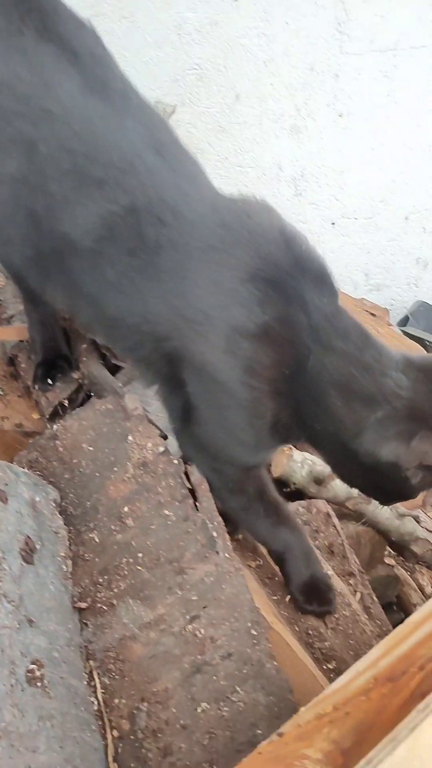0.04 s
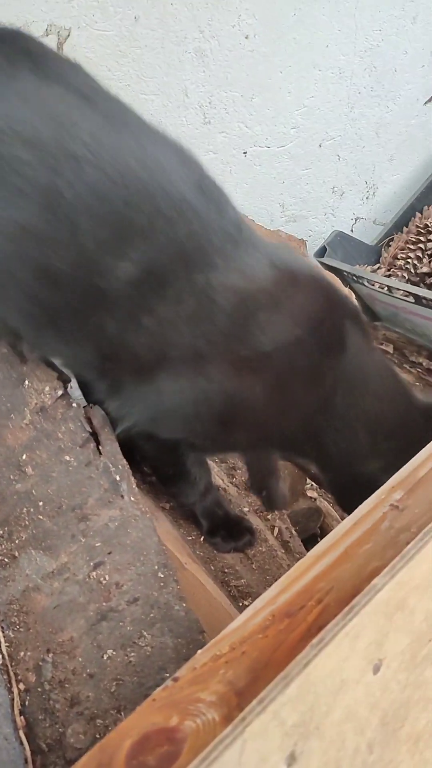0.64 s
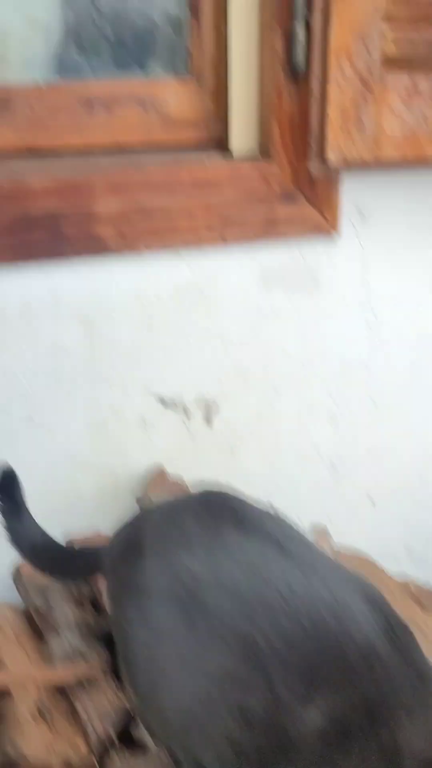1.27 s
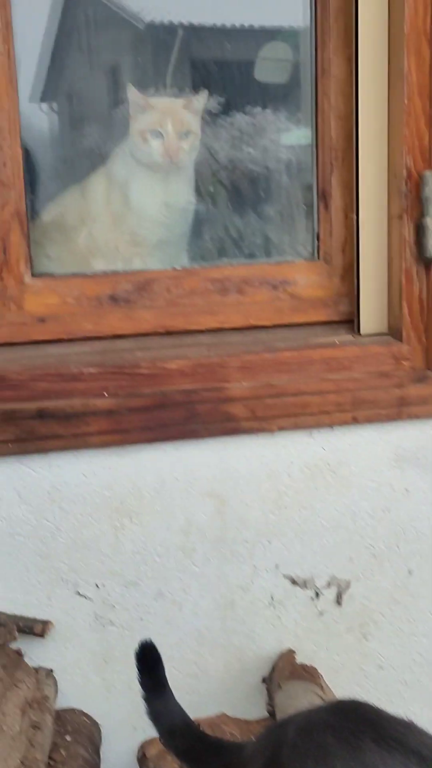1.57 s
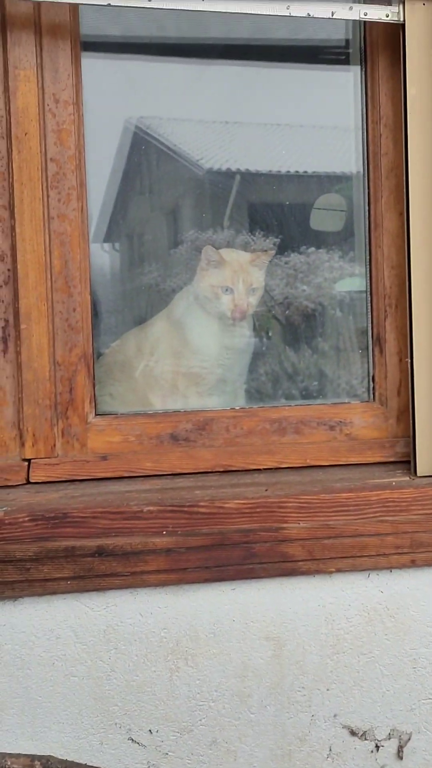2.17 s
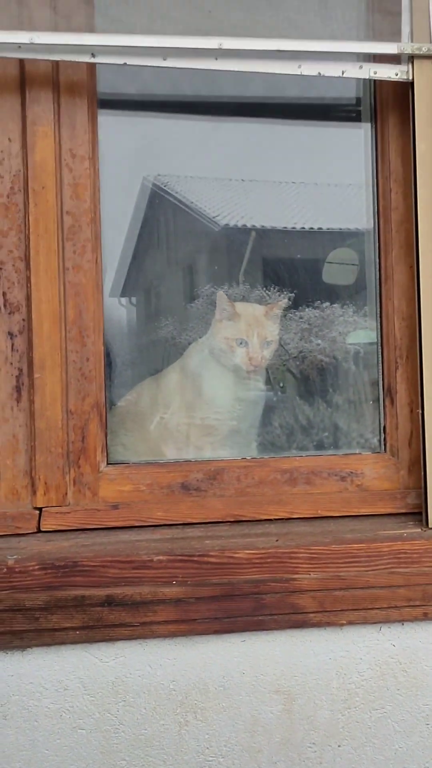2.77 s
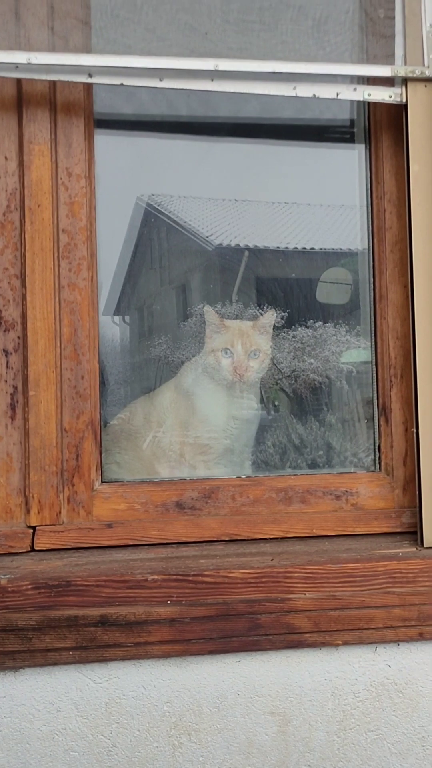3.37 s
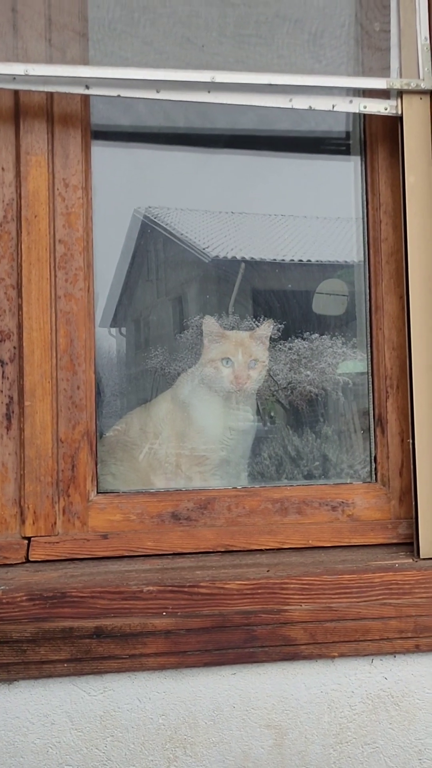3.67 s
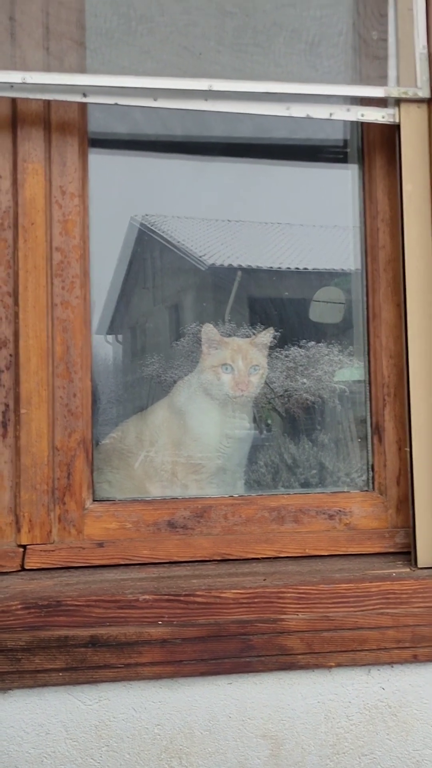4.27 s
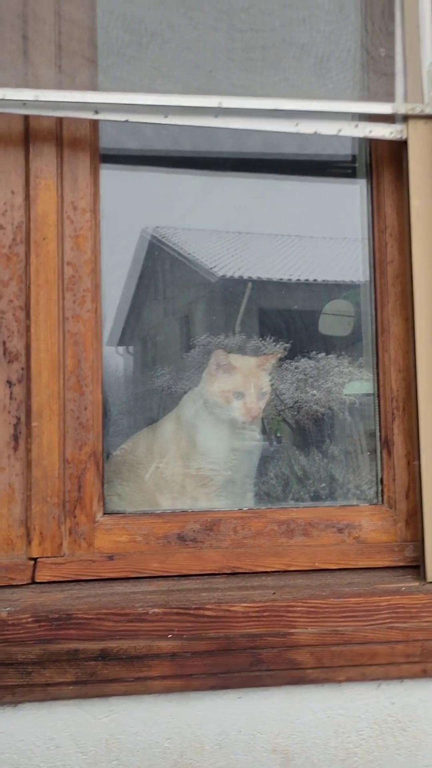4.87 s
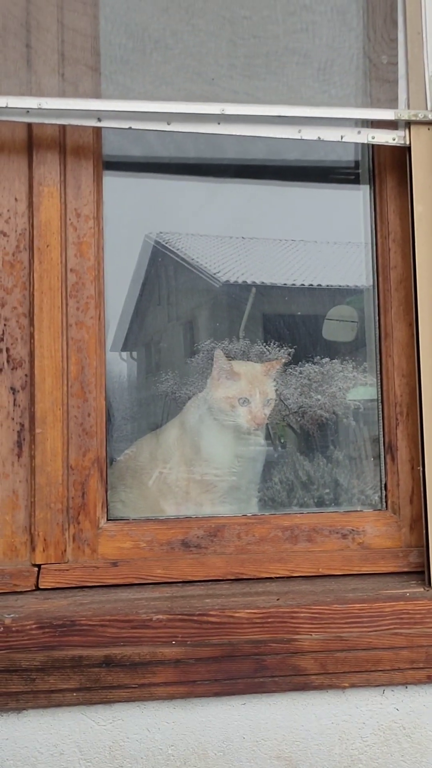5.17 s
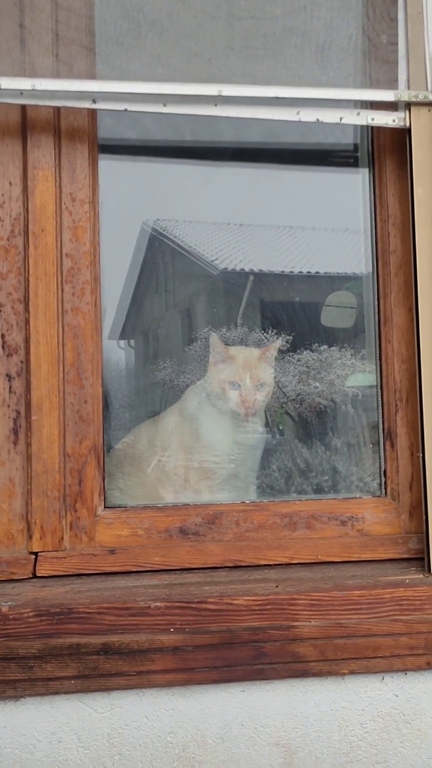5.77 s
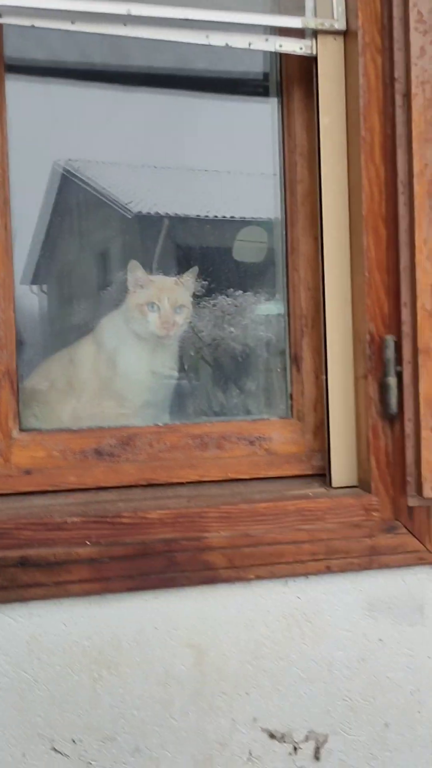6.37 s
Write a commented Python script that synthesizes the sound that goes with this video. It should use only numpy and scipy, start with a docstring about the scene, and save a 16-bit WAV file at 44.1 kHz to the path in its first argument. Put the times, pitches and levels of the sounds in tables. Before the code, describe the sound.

The sound is close, picked up outdoors beside a house wall by a microphone held near the body, over a faint low rumble. At about 0.1 seconds a light footstep snaps through crusted snow with a jacket swish. A second light step follows near 1 second, with more swishing. From about 1.5 to 1.9 seconds comes the loudest event: a heavy step that breaks the crust in a dense, crisp crunch, with a low thud of packing snow.

From 2 seconds on, the walker stands nearly still. Fabric slides softly, fingers bump the microphone now and then, and small crackles come from underfoot, clearest around 2.4, 3 and 6 seconds. A small piece of metal tinkles very faintly at about 4.3 and 5.1 seconds. A soft jacket swish swells from around 6 seconds to the end, at about 6.6 seconds.

```python
"""A light step snaps through crunchy ground, probably crusted snow, with the swish of a jacket.
A second light step follows, then a full, heavy one that breaks the crust and packs the snow beneath.
The walker then stands nearly still: fabric slides, fingers bump a camera held close to the body,
a bit of metal tinkles and small crackles go on underfoot. A house wall throws back a short tail
from the feet, and a faint outdoor rumble lies under it all."""
import sys
import numpy as np
from scipy import signal
from scipy.fft import rfft, irfft, next_fast_len
from scipy.io import wavfile
from scipy.ndimage import map_coordinates

SR = 44100
rng = np.random.default_rng(int(sys.argv[2]) if len(sys.argv) > 2 else 0)


def wav_out(sig):
    """Save sig, one row per channel (or a flat mono array), as 16-bit PCM at SR to the path in sys.argv[1]."""
    wavfile.write(sys.argv[1], SR, np.round(np.clip(np.atleast_2d(sig).T, -1, 1) * 32767).astype(np.int16))


N = 292323
TIME = np.arange(N) / SR
LAND_S, BEAR_S, LIFT_S = 1.64, 1.742, 1.84  # the heavy step lands, bears the most weight, lifts

# the clearest breaks of the crust: (time [s], level [dB], ping pitch [Hz])
CRUST_BREAKS = [(0.0709, -31, 4500), (0.1182, -12.0, 5130), (0.1278, -23, 4900), (0.146, -25, 5400),
                (0.1528, -21.5, 4600), (0.1636, -23, 4800), (0.201, -28.5, 4900), (0.2449, -28.6, 3900),
                (0.2567, -28.5, 4600), (0.3422, -27.5, 4500), (0.7008, -48.5, 4000), (0.972, -36.5, 4840),
                (1.0542, -25.0, 5300), (1.0589, -21.5, 5070), (1.0625, -17, 4760), (1.5089, -17.5, 5060),
                (1.599, -15, 5470), (1.6321, -12, 4560), (1.6578, -2.3, 4400), (1.6754, -7, 5620),
                (1.6826, -14, 5270), (1.6948, -3.5, 4700), (1.7073, -3.5, 5000), (1.7251, -7.7, 2510),
                (1.7341, -13.5, 3200), (1.749, -7.5, 4480), (1.7826, -6.5, 5100), (1.8045, -14, 4000),
                (1.8203, -15.5, 4500), (1.8277, -14.5, 4300), (1.8305, -13, 4300), (1.8755, -15.1, 5100),
                (1.8796, -16, 5270), (1.8937, -11, 4800), (1.9007, -18, 5200), (1.918, -31.5, 5220),
                (2.3933, -27, 5300), (2.4175, -21, 5600), (2.8904, -43.8, 5740), (3.0027, -31.0, 4690),
                (3.7634, -43.5, 5090), (4.2444, -42, 5500), (4.3482, -36.9, 5690), (4.7649, -39, 5100),
                (4.8444, -43.5, 5700), (5.0979, -32.5, 5840), (5.1555, -43.5, 4560), (5.341, -43.5, 5000),
                (5.3457, -41.5, 5100), (5.4932, -46, 4315), (5.5652, -45, 4440), (5.582, -47, 5340),
                (5.9874, -28.5, 4200), (6.0254, -35, 4500)]
# dead knocks of boots and of fingers on the camera: (time [s], peak [dB], pitch [Hz], decay [cycles])
KNOCKS = [(0.0681, -29.5, 420, 0.064), (.067, -45, 85, 0.54), (.978, -57, 202, .7), (1.709, -17, 1500, .7),
          (1.7483, -21, 920, 0.83), (1.7672, -21.5, 309, .5), (2.178, -57, 352, 0.35),
          (2.552, -53.5, 166.7, .5), (3.002, -44, 805, 1.16), (3.081, -60.5, 280, 0.45),
          (3.151, -55.5, 590, 0.6), (3.55, -59, 541, 0.76), (3.782, -54.5, 510, 0.48),
          (3.891, -49, 510, .5), (4.315, -54, 199.6, 0.46), (4.619, -55.5, 316, .4),
          (4.694, -47.5, 100, 0.62), (4.93, -50.5, 79.9, 0.72), (5.609, -56.5, 198.3, 0.4),
          (5.9873, -35, 2570, 0.74), (6.075, -61.5, 259, .6), (6.13, -52.5, 200, 0.68),
          (6.159, -56, 280, .6), (6.247, -44, 1700, 1.6)]
# touches of a small metal piece, perhaps a zip pull: (time [s], level [dB])
METAL_TOUCHES = [(4.35, -70), (4.358, -65.5), (5.1, -59), (5.115, -69)]
# its ringing modes: (frequency [Hz], relative level [dB], time to fall 60 dB [s])
METAL_MODES = [(655, -13, 0.065), (1250, -6, .07), (1464, -2, 0.044), (1790, -19, .05), (2870, -9, 0.06),
               (3880, -3, 0.073), (5860, 0, 0.043), (6220, 6.5, 0.049)]
# slips of the sole: (time [s], level [dB], length [s], hiss relative to grit [dB])
SOLE_SLIPS = [(0.067, -43, 0.008, -13.5), (0.29, -47.5, 0.026, -31), (0.773, -63.5, 0.017, -15),
              (1.72, -31, 0.02, -14.5), (1.826, -36.5, 0.02, -1.5), (2.986, -60, 0.029, 3),
              (3.52, -67.5, 0.012, 4), (4.282, -67.5, 0.044, 1), (4.346, -67, 0.018, 4),
              (4.684, -71.5, 0.019, 11), (5.099, -62, 0.0092, 22), (5.111, -69, 0.017, 17),
              (5.239, -74.5, 0.043, 10)]
# jacket strokes: (time at full speed [s], swish level [dB], 10 dB rise [s], hold [s], 10 dB fall [s],
# rub offset [dB])
JACKET_STROKES = [(0.0, -58, .05, 0.078, .05, -3.5), (0.152, -49, 0.054, 0.1, 0.078, -6),
                  (0.484, -57.5, .13, 0.032, 0.12, -9), (0.788, -70, .04, 0.1, .05, -6.5),
                  (1.072, -45, 0.054, .035, .17, -9.5), (1.245, -51, .07, 0.044, 0.25, -12),
                  (1.516, -46, 0.0097, .01, 0.042, -7), (1.583, -39, 0.023, .065, .07, -12.5),
                  (1.83, -40, 0.037, 0.053, 0.033, -7), (1.949, -54.5, 0.019, 0.0083, 0.029, -2.5),
                  (2.378, -66, 0.042, 0.17, 0.065, -7), (2.847, -68.5, 0.031, 0.04, .08, -7.5),
                  (3.0, -71.5, 0.033, 0.15, .04, -7.5), (3.874, -66, 0.084, 0.076, 0.029, -5.5),
                  (4.074, -66.5, 0.018, .02, 0.062, -17), (4.82, -71.5, 0.085, .03, .025, -7.5),
                  (4.93, -64.5, 0.034, .02, .04, -15.5), (5.061, -61, 0.021, .01, 0.018, -12),
                  (5.109, -59, 0.014, 0.016, 0.044, -10), (5.339, -69.5, .035, 0.22, 0.023, -9.5),
                  (6.22, -55.5, .2, 0.26, 0.13, -11), (6.62, -58.5, 0.059, .01, .1, -13)]
# the jacket's faint rustle as the body sways: (time [s], level [dB])
BODY_SWAY = [(0, -80.5), (1.8, -79), (2.0, -65), (2.3, -67.5), (2.7, -73), (3.0, -73.5), (3.45, -76),
             (3.55, -73), (3.74, -73.5), (4.02, -74), (4.18, -70.5), (4.34, -70.5), (4.41, -80.5),
             (4.6, -80), (4.72, -74), (5.0, -79.5), (5.68, -81), (5.77, -70.5), (6.63, -74)]

# tone colours, each (frequency [Hz], relative level [dB])
AIR_EQ = [(12, 3.5), (25, 5.5), (60, -1), (100, -11.5), (200, -15.5), (400, -27.5), (1000, -37.5),
          (4000, -40.5), (8000, -42)]  # outdoor rumble
STRIDE_EQ = [(1000, -41), (2300, -16.5), (3000, -12.5), (3700, -3), (4500, -1.5), (5200, 0), (6100, -2.5),
             (7000, -3.5), (7600, -7), (9000, -16.5)]  # broad swish of fabric in a stride
STANDING_EQ = [(1000, -51), (2500, -32), (3800, -11.5), (4500, -6.5), (5200, 1), (5850, 4.5), (6800, -3),
               (7500, -6.5), (9000, -25.5)]  # narrow, bright hiss of fabric at a stand; also the edge of a scrape
RUB_EQ = [(60, -24), (200, -0.5), (500, -0.5), (800, -0.5), (1200, -3), (1700, -3.5), (2500, -6),
          (3500, -3), (6000, -15.5), (9000, -29.5)]  # midrange body of rubbing folds
PACKING_EQ = [(18, -23), (35, -4.5), (75, 0), (140, -1), (300, -9), (600, -18), (1500, -45), (4000, -83.5)]  # low thud of snow packing
CRUNCH_EQ = [(60, -25.5), (200, -7), (500, -3), (880, 2), (1300, -3.5), (2200, -2), (3300, -1), (4700, 0.5),
             (7300, -3.5), (9000, -18)]  # crystals giving way


def amp(db):
    """Decibels to gain."""
    return 10 ** (np.asarray(db) / 20)


def unit(x):
    """Scale to rms 1."""
    return x / np.sqrt(np.mean(x ** 2) + 1e-20)


def filtered(x, response):
    """Filter x by a gain given as a function of frequency."""
    size = next_fast_len(N + 8192)
    return irfft(rfft(x, size) * response(np.fft.rfftfreq(size, 1 / SR)), size)[:N]


def coloured(x, eq):
    """Shape x with an EQ curve on a log frequency axis, at rms 1."""
    points_hz, db = np.transpose(eq)
    return unit(filtered(x, lambda hz: amp(np.interp(np.log(hz + 1), np.log(points_hz), db))))


def wobble(rate):
    """A smooth random curve, rate knots a second."""
    return map_coordinates(rng.standard_normal(int(N * rate / SR) + 4), [TIME * rate])


def grains(rate, spread_db):
    """Random one-sided clicks, about rate a second, many small and a few large, at rms 1."""
    size = amp(spread_db * np.minimum(rng.exponential(size=N), 4))
    return unit(size * (rng.random(N) < rate / SR))


def add(track, s, sound):
    """Mix a sound into the track at time s."""
    start = max(round(s * SR), 0)
    track[start:start + len(sound)] += sound[:max(N - start, 0)]


def outside(start, end):
    """Seconds still to go before start, and seconds gone since end, for each sample."""
    return np.maximum(start - TIME, 0), np.maximum(TIME - end, 0)


def outdoor_air(level_db=-67):
    """A bed of faint rumble whose level drifts."""
    return amp(level_db + wobble(5)) * coloured(rng.standard_normal(N), AIR_EQ)


def wall_reflections(x, level_db=-29, t60=.09, predelay_s=.003):
    """The house wall and the ground scatter back a short, weak tail."""
    t = np.arange(SR // 5) / SR
    tail = rng.standard_normal(len(t)) * amp(-60 * t / t60) * (t > predelay_s)
    return amp(level_db) * signal.fftconvolve(x, tail / np.linalg.norm(tail))[:N]


def metal_tinkles():
    """Each touch rings the metal's modes at new strengths."""
    out, t = np.zeros(N), np.arange(SR // 5) / SR
    for s, db in METAL_TOUCHES:
        strengths = amp(db + 2 * rng.standard_normal(len(METAL_MODES)))
        for strength, (hz, mode_db, t60) in zip(strengths, METAL_MODES):
            add(out, s, strength * amp(mode_db - 60 * t / t60) * np.sin(2 * np.pi * hz * t))
    return out


def knocks():
    """A heavily damped bump of boot or finger swings about once; the deadest give a single push."""
    out, t = np.zeros(N), np.arange(SR // 10) / SR
    for s, db, hz, cycles in KNOCKS:
        swing = np.sin(2 * np.pi * hz * t) * np.exp(-t * hz / cycles)
        add(out, s, amp(db) * swing / swing.max())
    return out


def body_movement(sway_rub_db=-81, rub_follows=.25):
    """Envelopes of the fabric's swish and rub: each stroke rises, holds and falls on top of the sway."""
    sway_db = np.interp(TIME, *np.transpose(BODY_SWAY))
    swish_power = amp(sway_db + 1.2 * wobble(14)) ** 2
    rub_power = amp(sway_rub_db + rub_follows * (sway_db - sway_db.mean())) ** 2
    for s, db, rise, hold, fall, rub_db in JACKET_STROKES:
        before, after = outside(s, s + hold)
        stroke_power = amp(db - 10 * (before / rise + after / fall)) ** 2
        swish_power += stroke_power
        rub_power += stroke_power * amp(rub_db) ** 2
    return np.sqrt(swish_power), np.sqrt(rub_power)


def jacket(swish, rub, rub_trim_db=-1, settle_s=1.86, crossfade_s=.089):
    """Sliding fabric hisses, broad in a stride and narrow once standing; single fibres catch and tick."""
    catches = grains(rate=98, spread_db=4)
    threads = rng.standard_normal(N) + amp(-12) * catches
    folds = rng.standard_normal(N) + amp(-6) * catches + amp(-8) * grains(rate=240, spread_db=1)
    standing = np.clip((TIME - settle_s) / crossfade_s + .5, 0, 1)
    hiss = (1 - standing) * coloured(threads, STRIDE_EQ) + standing * coloured(threads, STANDING_EQ)
    flutter = amp(.8 * wobble(90))
    return flutter * (swish * hiss + amp(rub_trim_db) * rub * coloured(folds, RUB_EQ))


def underfoot_crackles(motion, trim_db=-9):
    """As the body moves, its weight shifts and single crystals give way in small flurries."""
    flurries = unit(amp(4 * np.tanh(wobble(9))))
    crystals = coloured(grains(rate=110, spread_db=2.2), CRUNCH_EQ)
    return amp(trim_db) * motion * flurries * crystals


def sole_scrapes(attack_s=.00019):
    """The sole slips briefly over the crust: grit with a hissing edge."""
    out, t = np.zeros(N), np.arange(SR // 6) / SR
    grit = coloured(grains(rate=4500, spread_db=2), CRUNCH_EQ)
    hiss = coloured(grains(rate=5800, spread_db=5), STANDING_EQ)
    for s, db, length, hiss_db in SOLE_SLIPS:
        envelope = amp(db) * (1 - np.exp(-t / attack_s)) * np.exp(-(t / length) ** 2)
        span = round(s * SR) + np.arange(len(t))
        add(out, s, envelope * (grit[span] + amp(hiss_db) * hiss[span]))
    return out


def foot_load_db(press_db_per_s=150, roll_db_per_s=80, release_db_per_s=375):
    """Load on the snow in the heavy step, 0 dB at most: the foot presses, rolls over and lets go."""
    before, after = outside(LAND_S, LIFT_S)
    roll_db = roll_db_per_s * np.abs(TIME - BEAR_S)
    return np.maximum(-press_db_per_s * before - roll_db - release_db_per_s * after, -120)


def heavy_step(packing_db=-34, crunch_db=-29.5, packing_grows=1.1, edge_s=.008, off_ground_db=-11):
    """Under full weight the snow packs in low jolts while its crystals crunch."""
    load_db = foot_load_db()
    off_ground = 1 - np.exp(-sum(outside(LAND_S, LIFT_S)) / edge_s)
    packing_gain = amp(packing_db + packing_grows * load_db + off_ground_db * off_ground)
    jolts = coloured(grains(rate=700, spread_db=1.5), PACKING_EQ)
    crystals = coloured(grains(rate=1800, spread_db=5.5), CRUNCH_EQ)
    roughness = unit(amp(2 * wobble(220)))
    return packing_gain * jolts + amp(crunch_db + load_db) * crystals * roughness


def lesser_breaks(mean_delay_s=.02, weaker_db=17, spread_db=4, count=2):
    """Under a walking foot each break sets off weaker ones just after it; rows as in CRUST_BREAKS."""
    return [(s + mean_delay_s * rng.exponential(), db - weaker_db - spread_db * rng.exponential(), hz)
            for s, db, hz in CRUST_BREAKS if s < LIFT_S for _ in range(count)]


def crust_snaps(breaks, width_hz=1400, crack_hz=1900, muffle_hz=6900,
                crack_decay_s=.00009, push_decay_s=.00017, splinter_decay_s=.0017):
    """Each break is a dry crack, a ping of a few cycles, a one-sided push and a spray of splinters."""
    out, t = np.zeros(N), np.arange(SR // 50) / SR
    # heavily loaded crust breaks dull and dead, lightly loaded crust rings a little longer
    dullness_db = np.maximum(foot_load_db() - 3, -25.5)
    for s, db, ping_hz in breaks:
        dull_db = dullness_db[int(np.clip(s * SR, 0, N - 1))]
        damping_hz = width_hz * np.exp(rng.normal(0, .16)) * amp(.15 * (dull_db + 25))
        age = 2 * np.pi * damping_hz * t
        flex = age * np.exp(1 - age) * np.sin(2 * np.pi * ping_hz * t)
        # a small source radiates its acceleration
        ping = -np.diff(flex, prepend=0) * SR / (2 * np.pi * ping_hz)
        crack = 2 * np.diff(np.exp(-t / crack_decay_s) * np.cos(2 * np.pi * crack_hz * t), prepend=0)
        push = np.exp(-t / push_decay_s)
        splinters = np.diff(rng.standard_normal(len(t) + 1)) * np.exp(-t / splinter_decay_s)
        snap = amp(2) * ping + crack + amp(dull_db + 4) * push + amp(-27) * splinters
        add(out, s, amp(db) * snap)
    return filtered(out, lambda hz: 1 / np.sqrt(1 + (hz / muffle_hz) ** 8))  # the sole muffles the top


def scene():
    """Feet, clothes and hands over the quiet of the yard, in mono."""
    swish, rub = body_movement()
    snaps = crust_snaps(CRUST_BREAKS + lesser_breaks())
    feet = snaps + heavy_step() + sole_scrapes() + underfoot_crackles(rub)
    mix = feet + wall_reflections(feet) + jacket(swish, rub) + knocks() + metal_tinkles() + outdoor_air()
    return mix[None]


def record(dry, cutoff_hz=7800):
    """The camera's band limit: a steep high cut on the whole mix."""
    return filtered(dry[0], lambda hz: 1 / np.sqrt(1 + (hz / cutoff_hz) ** 70))[None]


dry = scene()
out = record(dry)
wav_out(out)
```